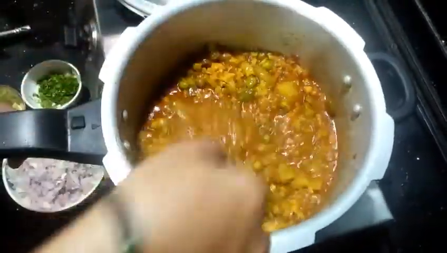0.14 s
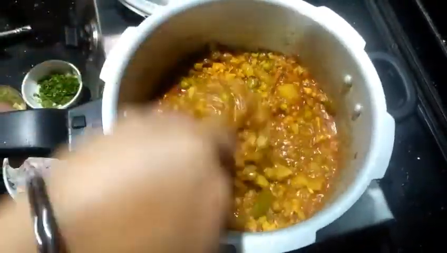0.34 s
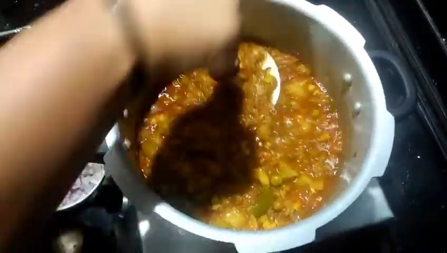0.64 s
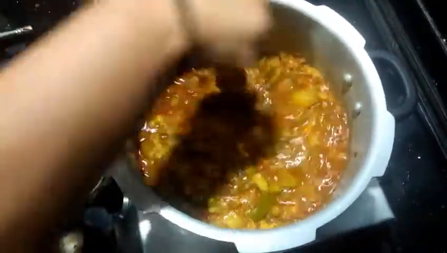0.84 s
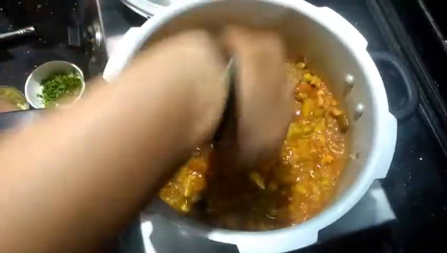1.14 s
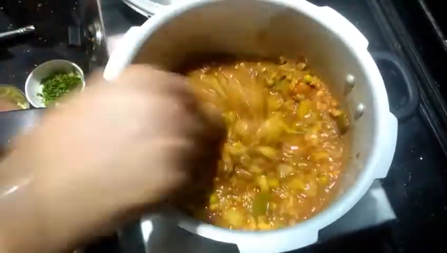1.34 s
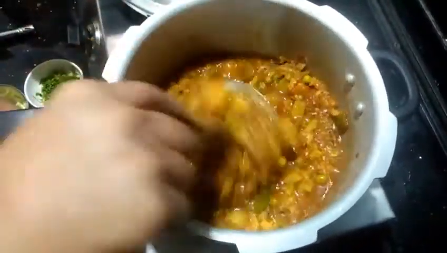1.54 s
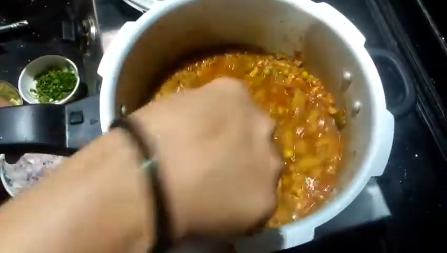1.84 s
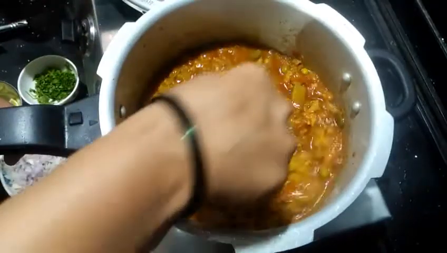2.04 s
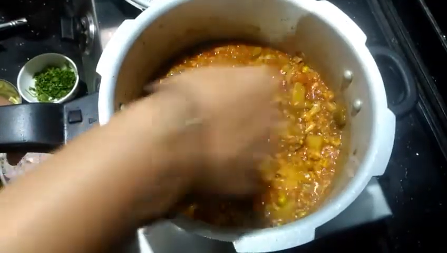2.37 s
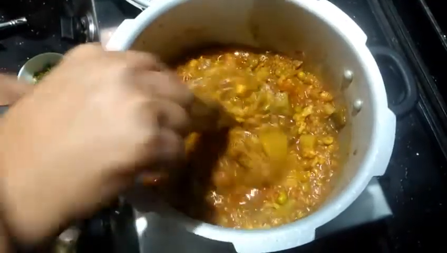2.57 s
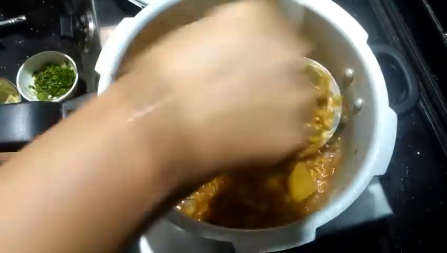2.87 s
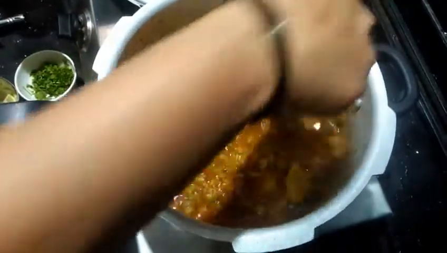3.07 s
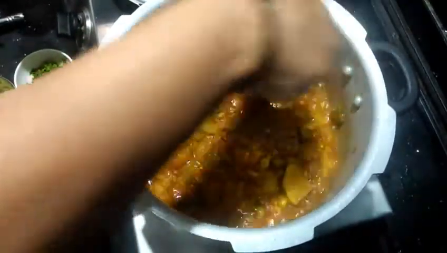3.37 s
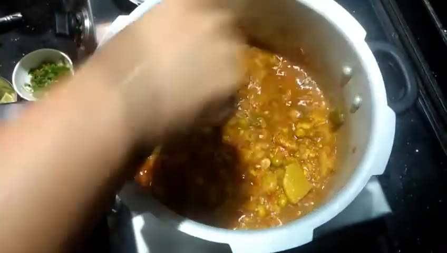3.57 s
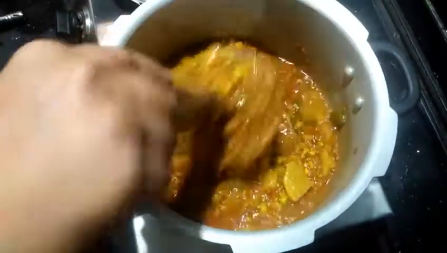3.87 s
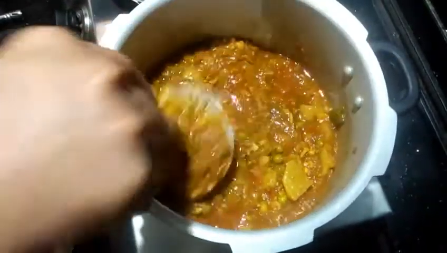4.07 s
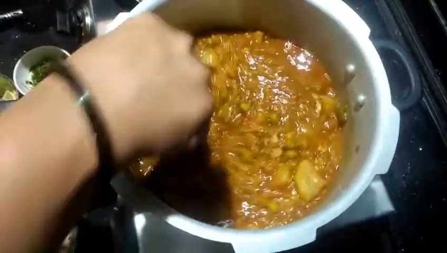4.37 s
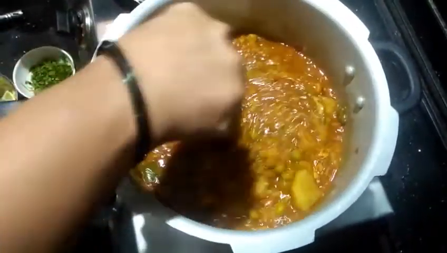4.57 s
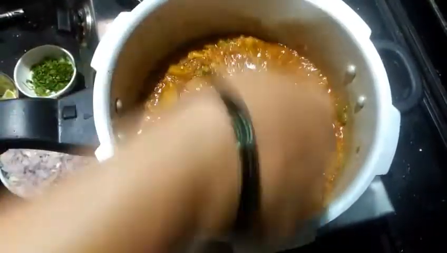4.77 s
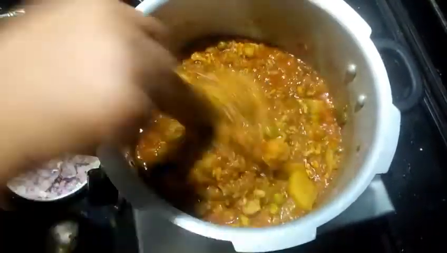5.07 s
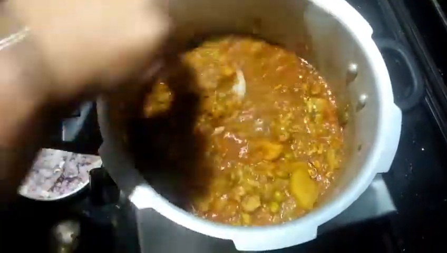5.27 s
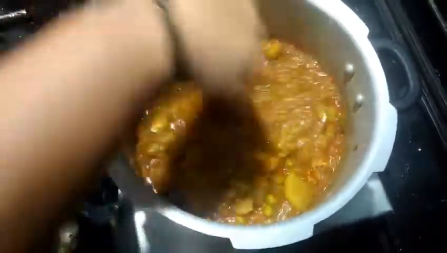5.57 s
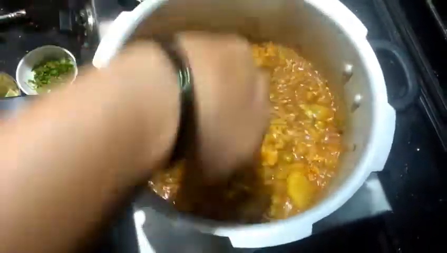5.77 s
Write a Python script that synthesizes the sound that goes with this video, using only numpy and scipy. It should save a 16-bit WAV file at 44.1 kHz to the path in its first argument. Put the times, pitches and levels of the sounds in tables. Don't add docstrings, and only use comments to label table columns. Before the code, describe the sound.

A hand masher works soft vegetables in sauce inside a deep metal pot, heard close by a nearly mono phone microphone in a small kitchen. Quiet squelching, rounded little pops and faint hiss begin at once over low rumble. At 0.7 seconds steel strikes high on the pot wall, a bright stuttering clank with a short ring cut off quickly. Light wet rubbing follows, with a small pop at 1.6. Near 1.9 comes a softer, rattlier knock, then a faint dull tap at 2.1. Pops gather from 2.7, peaking at 3.1 to 3.3 with thick squelches, sauce spits, scraping and a soft pot bump. Another bump falls at 3.6. The loudest knock hits the pot floor at 4.2, ringing clearly. After a muted bump near 4.65 the mashing fades; a crisp spit and scrape comes at 5.35, then faint rubbing and low bumps to about 6 seconds.

```python
import sys
import numpy as np
from scipy import signal
from scipy.io import wavfile
from scipy.ndimage import uniform_filter1d

SR = 44100
rng = np.random.default_rng(int(sys.argv[2]) if len(sys.argv) > 2 else 0)


def invert_db(x):
    u = np.asarray(x, float) / 20
    return 10 ** u


def generate_wav(sig):
    pcm = np.round(np.clip(np.atleast_2d(sig).T, -1, 1) * 32767).astype(np.int16)
    wavfile.write(sys.argv[1], SR, pcm)


N = 261104


def at_hz(points, hz):
    return np.interp(np.log(hz), np.log(np.array(points)[:, 0]), np.array(points)[:, 1])


def rms_one(x):
    return x / np.sqrt(np.mean(x ** 2) + 1e-20)


def drift(rate):
    r = np.exp(-80 * np.pi * rate / SR)
    steps = rng.standard_normal(N // 40 + 2002)
    slow = signal.lfilter([1], [1, -2 * r, r * r], steps)[2000:]
    return np.interp(np.arange(N) / 40, np.arange(len(slow)), rms_one(slow))


def bands(spectrum, source, shape):
    lowest, highest = spectrum[0][0], min(spectrum[-1][0], 16000)
    edges = lowest * 2 ** np.arange(0, np.log2(highest / lowest) + .34, 1 / 3)
    out = 0
    for k, (low, high) in enumerate(zip(edges, edges[1:])):
        hz = np.sqrt(low * high)
        part = signal.sosfilt(signal.butter(3, [low, high], "band", fs=SR, output="sos"), source[k % 2])
        out = out + invert_db(at_hz(spectrum, hz)) * shape(hz) * part
    return out


def random_grains(per_s, spread_db):
    strength = invert_db(spread_db * np.minimum(rng.exponential(1, N), 4))
    return (rng.random(N) < per_s / SR) * strength * rng.choice([-1, 1], N)


def wet_noise(spectrum, per_s, spread_db, smooth, patchy_db, patch_rate):
    source = rms_one(random_grains(per_s, spread_db)) + smooth * rng.standard_normal((2, N))
    together = drift(patch_rate)

    def flicker(hz):
        return invert_db(patchy_db * np.minimum(together + drift(patch_rate), 2.3))

    return rms_one(bands(spectrum, source, flicker))


def ringing(t, modes, spread_db):
    hz, db, t60 = np.transpose(modes)[:, :, None]
    strength = invert_db(db + spread_db * rng.standard_normal(hz.shape))
    rings = np.sum(strength * invert_db(-60 * t / t60) * np.sin(2 * np.pi * hz * t), axis=0)
    return rings / np.abs(rings).max()


def resonance(x, hz, width_hz, passes):
    r = np.exp(-np.pi * width_hz / SR)
    for _ in range(passes):
        x = signal.lfilter([1, 0, -1], [1, -2 * r * np.cos(2 * np.pi * hz / SR), r * r], x)
    return x


def add(out, s, sound):
    i = round(s * SR)
    out[i:i + len(sound)] += sound[:N - i]


# start_s, level_db (peak), crack_db (above 2.3 kHz), weight_db (below 500 Hz), tail_db
HARD_KNOCKS = [
    (0.7055, -14, -17.5, -40, -5),
    (1.8735, -20, -18, -29, -9),
    (2.100, -31, -60, -46, -9),
    (4.19, -10.5, -17, -23, -4),
]
# delay_s after its start, level_db
TOUCHES = [
    [(0, 0), (.005, -6), (.009, -9)],
    [(0, -1.5), (.002, -2), (.006, -5), (.017, -12)],
    [(0, -4), (.007, -1), (.015, -1), (.02, -4), (.03, -5), (.048, -11)],
    [(0, 0), (.0055, -3.5), (.015, -9), (.022, -10), (.05, -9)],
]
# crowd_db (dense modes), treble_db (of the crowd), masher_db, sheen_db (above 8 kHz)
ANSWERS = [
    (-5.5, 6.5, -9, -4),
    (-1.5, 3.5, -1, -16),
    (-0.7, 0.1, -7, -40),
    (1.5, 0.5, -12, -1.5),
]
# pitch_hz, level_db, t60_s
HIGH_WALL = [(420, -17, 0.16), (1044, -2, 0.22), (1150, -7, 0.22), (1288, -5, 0.2), (1357, 0.5, 0.2),
             (1400, -3, 0.2), (1966, 0, 0.2), (2078, -1, 0.2), (2385, -18, 0.2), (3112, -21, 0.2),
             (3370, -11, 0.3)]
# pitch_hz, level_db, t60_s
LOW_WALL = [(609, -14, 0.066), (744, -23, 0.3), (1089, -0.5, 0.12), (1473, -3, 0.12), (1578, 1.5, 0.1),
            (1755, -10.5, 0.15), (1960, -9, 0.3), (1378, -10, 0.2), (2745, -24, 0.2), (3300, -12, 0.05)]
# pitch_hz, level_db, t60_s
FLOOR = [(270, -14.5, 0.6), (323, -17, 0.5), (736, -17, 0.7), (863, -13, 0.6), (883, -12, 0.6),
         (1045, -1.5, 0.4), (1164, -7, 0.5), (1310, -8, 0.3), (1537, -9, 0.35), (1578, -5, 0.4),
         (1900, 0.5, 0.3), (1965, -4, 0.15), (3246, -19, 0.16), (3413, -20, 0.25)]
# pitch_hz, level_db, t60_s
MASHER_STEEL = [(3300, -2, .04), (3530, 0, .04), (3655, -6, .08), (3887, -4, .06), (4888, -6, .05),
                (5200, -6, .04), (5620, -10, .05), (6438, -12, .05), (7165, -9, .05), (7700, -14, .05),
                (8845, -17, .04)]
# pitch_hz, level_db per Hz
CROWD = [(88, -43), (150, -15), (232, -16.5), (327, -8), (527, -21), (740, -11), (1050, -4.5), (1220, -1),
         (1560, 1.5), (1720, -8), (1920, -1.5), (2760, -26), (3340, -12), (4500, -25), (6500, -21.5),
         (14200, -30)]
# pitch_hz, t60_s
CROWD_T60 = [(200, 0.5), (700, 1), (1500, 0.41), (4000, 0.56), (12000, 0.47)]
GATE_S = 0.21
SLIP = 1.8


def knock_ring(t, modes, touches):
    half, eighth = t[:SR // 2], t[:SR // 8]
    chatter = 0.022 * rng.standard_normal(SR // 4) * invert_db(-60 * t[:SR // 4] / 0.34)
    pot = stem = 0
    for delay, level in touches:
        later = (round(delay * SR), SR)
        pot_hit = ringing(half, modes, spread_db=2.0) * invert_db(-60 * half / 0.8)
        stem_hit = ringing(eighth, MASHER_STEEL, spread_db=3.0) * (1 - np.exp(-eighth / .0015))
        pot = pot + invert_db(level) * np.pad(pot_hit, later)[:SR]
        stem = stem + invert_db(SLIP * level) * np.pad(stem_hit, later)[:SR]
    return pot + signal.fftconvolve(pot, chatter)[:SR], stem


def knocks():
    out, t = np.zeros(N), np.arange(SR) / SR
    dull = signal.butter(8, 2300, fs=SR, output="sos")
    sheen = signal.butter(2, 8000, "high", fs=SR, output="sos")
    rattle = invert_db(1.3 * drift(40))
    places = [HIGH_WALL, LOW_WALL, LOW_WALL, FLOOR]
    for knock, answer, modes, touches in zip(HARD_KNOCKS, ANSWERS, places, TOUCHES):
        s, db, crack_db, weight_db, tail_db = knock
        crowd_db, treble_db, masher_db, sheen_db = answer

        def fading(t60, slip=1):
            return sum(invert_db(slip * a - 60 * np.abs(t - d) / t60) * (t >= d) for d, a in touches)

        tail = invert_db(tail_db) * rattle[round(s * SR):][:SR]
        burst = fading(0.055)
        tilt_db = [(500, weight_db + 19.5), (950, 0), (2400, 0), (3000, treble_db)]

        def dying(hz):
            return invert_db(at_hz(tilt_db, hz)) * (tail * invert_db(-60 * t / at_hz(CROWD_T60, hz)) + burst)

        crowd = bands(CROWD, rng.standard_normal((2, SR)), dying)
        clear, stem = knock_ring(t, modes, touches)
        crack = invert_db(-6) * rng.standard_normal(SR) * fading(.012, SLIP) + invert_db(masher_db) * stem
        hit = invert_db(-1.5) * clear / np.abs(clear).max() + invert_db(crowd_db) * crowd / np.abs(crowd).max() + crack
        hit = (1 - np.exp(-t / 0.0005)) * invert_db(-12 * (t / GATE_S) ** 3) * hit
        hit -= (1 - invert_db(min(sheen_db, 0))) * signal.sosfiltfilt(sheen, hit)
        low = signal.sosfiltfilt(dull, hit)
        add(out, s, invert_db(db) * (low + invert_db(crack_db + 17) * (hit - low)))
    return out


# start_s, level_db (peak), pitch_hz
AIR_POPS = [(0.232, -48, 869), (0.282, -34.5, 1270), (0.291, -35, 1202), (0.407, -50, 1290),
            (0.575, -51, 1190), (0.636, -44, 910), (0.834, -44, 646), (0.878, -42.5, 660),
            (1.039, -48, 930), (1.418, -50.5, 734), (2.07, -37, 854), (2.235, -35, 1310),
            (2.266, -45, 1360), (2.368, -35, 1270), (2.698, -41.5, 1450), (2.808, -36, 1180),
            (2.848, -40, 1254), (2.878, -30, 1200), (2.969, -37.5, 1223), (3.111, -26, 1320),
            (3.2615, -34, 1120), (3.542, -44, 1286), (3.691, -48, 1450), (4.017, -46.5, 1220),
            (4.102, -38, 996), (4.181, -44, 900), (4.481, -40.5, 1225), (4.585, -48, 1157),
            (4.72, -45, 1253), (4.862, -53, 1270),
            (0.018, -27, 1780), (0.158, -53, 1660), (0.235, -49, 2400), (0.4096, -53, 1880),
              (0.4334, -51, 1940), (0.5727, -49, 1800), (0.649, -47, 1820), (0.984, -45.5, 1700),
              (1.621, -32.5, 1870), (1.67, -48, 1950), (1.8128, -52, 2370), (2.3713, -42, 1640),
              (2.399, -45.5, 2466), (2.555, -44, 1880), (2.596, -37.5, 1880), (2.9694, -40, 1800),
              (3.072, -37, 2540), (3.204, -40, 2045), (3.8425, -50.5, 1755), (3.88, -38.5, 1900),
              (4.751, -47.5, 1650), (5.05, -57.5, 1620),
            (.07, -52, 520), (.41, -52, 2380), (.5, -50, 1230), (.5, -52, 870), (.632, -48, 600),
              (.91, -53, 417), (.949, -48, 651), (.978, -53, 431), (1.04, -51, 1260), (1.095, -49, 1340),
              (1.099, -55, 420), (1.11, -53, 2050), (1.12, -52, 880), (1.184, -60, 431), (1.294, -60, 323),
              (1.298, -54, 754), (1.48, -55, 1800), (1.558, -52, 705), (1.605, -50, 950),
              (1.615, -51, 1300), (1.832, -46, 1200), (1.862, -46, 1100), (2.495, -50, 859),
              (2.646, -53, 856), (2.686, -54, 1030), (2.748, -46, 1250), (2.795, -50, 947),
              (2.925, -49, 1060), (2.968, -58, 431), (3.065, -48, 1310), (3.071, -41, 697),
              (3.254, -42, 1350), (3.317, -46, 554), (3.345, -45, 900), (3.35, -47, 1450), (3.43, -48, 900),
              (3.465, -47, 886), (3.564, -47, 1440), (3.601, -44, 875), (3.623, -42, 630),
              (3.774, -52, 541), (3.828, -49, 560), (3.928, -52, 530), (3.988, -49, 872), (4.14, -52, 900),
              (4.51, -51, 1300), (4.635, -51, 412), (4.66, -54, 1230), (4.755, -51, 1270),
              (4.79, -55, 1600), (4.93, -59, 1680), (5.831, -60, 404), (5.885, -60, 420)]
RING_S, RING_S_PER_DB = 0.016, 0.0004
RING_CYCLES = 12


def pops():
    out, t = np.zeros(N), np.arange(SR // 8) / SR
    swell = 1 - np.exp(-(t / .002) ** 2)
    for s, db, hz in AIR_POPS:
        ring = np.sin(2 * np.pi * hz * (t + .5 * t * t))
        band = signal.butter(2, [hz * .75, hz * 1.3], "band", fs=SR, output="sos")
        rough = rms_one(signal.sosfilt(band, rng.standard_normal(len(t))))
        t60 = max(RING_S + RING_CYCLES / hz - RING_S_PER_DB * (db + 40), .005)
        burst = swell * invert_db(-60 * t / t60) * (ring + 0.35 * rough)
        add(out, s - .001, invert_db(db + 2.5) * signal.sosfilt(band, burst))
    return out


# start_s, level_db (peak), pitch_hz
SAUCE_SPITS = [(0.0218, -52.5, 3540), (0.0723, -52.5, 5160), (0.4994, -51.5, 3000), (0.634, -59, 8600),
               (1.5196, -50.5, 4140), (1.8128, -40, 3560), (1.8128, -44, 4800), (1.8185, -45, 8300),
               (1.566, -55, 4600), (2.16, -56, 13000), (2.206, -56, 7600), (2.739, -57, 4200),
               (2.9377, -53, 11300), (2.9841, -53, 3430), (3.072, -42, 6000), (3.1063, -38, 5300),
               (3.1294, -34.5, 4000), (3.2015, -38.5, 3570), (3.6922, -50, 3120), (3.854, -61, 5940),
               (3.901, -61, 4400), (3.9955, -65, 5590), (4.075, -61, 8000), (4.1112, -41, 7950),
               (4.123, -50, 11700), (4.4603, -59, 3270), (4.4816, -43, 3200), (4.611, -52, 3950),
               (4.76, -63.5, 8110), (5.1714, -64, 7900), (5.2989, -64, 8000), (5.3441, -35.5, 4370),
               (5.3653, -39, 4930),
               (.283, -56, 2900), (.4868, -55, 6060), (.96, -58, 4500), (1.04, -58, 3500), (1.1, -58, 5000),
             (2.3734, -57, 4300), (2.482, -60, 3350), (2.555, -60, 4600), (2.5974, -58, 3300),
             (2.5974, -60, 5400), (2.632, -60, 3300), (2.69, -56, 5200), (2.84, -59, 5000),
             (2.864, -59, 3500), (2.937, -58, 5700), (2.99, -57, 4600), (3.074, -42, 6400),
             (3.116, -44, 5700), (3.119, -44, 4000), (3.131, -42, 3200), (3.14, -46, 4200),
             (3.21, -44, 4600), (3.236, -48, 2600), (3.3668, -54, 2900), (3.417, -54, 4800),
             (3.8432, -57, 3120)]


def spits():
    out, t = np.zeros(N), np.arange(SR // 12) / SR
    bright = signal.butter(2, 3000, "high", fs=SR, output="sos")
    shape = (1 - np.exp(-t / 0.0012)) * invert_db(-60 * t / 0.036)
    for s, db, hz in SAUCE_SPITS:
        puff = rng.standard_normal(len(t))
        band = signal.butter(1, [hz * 0.9, hz * 1.12], "band", fs=SR, output="sos")
        peak = rms_one(signal.sosfilt(band, puff))
        wide = rms_one(signal.sosfilt(bright, puff))
        add(out, s, invert_db(db - 4.5) * shape * (peak + 0.17 * wide))
    return out


# pitch_hz, width_hz, level_db
AIR_SPACE = [(590, 120, -2.5), (882, 81, -0.5), (1050, 110, -6), (1270, 190, 0.5), (1605, 150, -6),
             (429.8, 40, -12), (1900, 420, -4), (2120, 220, -13), (2650, 260, -11)]


def squelch(per_s, spread_db, patchy_db):
    out = 0
    for hz, width_hz, db in AIR_SPACE:
        grains = signal.lfilter([1], [1, -.7], random_grains(per_s, spread_db))
        source = rms_one(grains) + 0.98 * rng.standard_normal(N)
        tone = rms_one(resonance(source, hz, width_hz, passes=2))
        out = out + invert_db(db + patchy_db * drift(5.4)) * tone
    return rms_one(out)


# pitch_hz, level_db per Hz
MASH_COLOUR = [(240, -42), (400, -16.5), (649, -2), (1100, -0.5), (1240, -0.5), (1570, -10.5), (1920, -6),
               (3400, -23.5), (4420, -60), (7480, -120)]


def squeezed_mash():
    return wet_noise(MASH_COLOUR, per_s=280, spread_db=-4.5, smooth=2.2, patchy_db=3.5, patch_rate=12)


# time_s, level_db
STROKE_EFFORT = [(0.0, -58.5), (0.63, -61), (0.74, -54.5), (1.19, -59), (1.35, -64.5), (1.7, -58),
                 (2.04, -54), (2.36, -60.5), (2.93, -56), (3.18, -50), (3.4, -50.5), (3.5, -57.5),
                 (4.14, -66.5), (4.22, -54), (4.48, -59), (4.8, -68.5), (5.57, -66), (5.92, -70)]


def effort():
    s, db = np.transpose(STROKE_EFFORT)
    return np.interp(np.arange(N) / SR, s, db)


# start_s, length_s, level_db (start), change_db (to end)
DRAGS = [(0.03, 0.093, -76, 6), (0.232, 0.1, -76, -0.6), (0.432, 0.1, -72, 1.5), (0.635, 0.065, -72, 14),
         (0.9, 0.44, -72.5, -2.5), (1.477, 0.35, -73, -1.5), (1.816, 0.054, -54, -12),
         (2.117, 0.15, -73.5, 3), (2.564, 0.49, -81, 8), (3.074, 0.028, -49, -7), (3.108, 0.085, -49.5, -6),
         (3.2, 0.05, -52, -9), (3.252, 0.23, -64, -7), (3.581, 0.092, -72, -3), (3.855, 0.071, -63.5, -8),
         (3.99, 0.12, -82, 6), (4.115, 0.054, -54, -14), (4.47, 0.16, -70.5, -3), (5.3, 0.04, -70, 20),
         (5.348, 0.091, -45, -23), (5.487, 0.084, -68.5, -13)]
# pitch_hz, level_db per Hz
WET_HISS = [(1940, -27.5), (3300, -4), (5720, -6), (6700, -5), (8610, -6.5), (10000, -14), (12600, -9),
            (14200, -7)]
GRIP_S, LET_GO_S, EDGE_DB = 0.015, 0.025, 22


def scrapes():
    t, gain = np.arange(N) / SR, 0
    for s, length, db, change_db in DRAGS:
        end_db = db + change_db
        times = [s - GRIP_S, s, s + length, s + length + LET_GO_S]
        levels = [db - EDGE_DB, db, end_db, end_db - EDGE_DB]
        gain = gain + invert_db(np.interp(t, times, levels, left=-200, right=-200))
    grit = wet_noise(WET_HISS, per_s=900, spread_db=4.0, smooth=1.2, patchy_db=2.6, patch_rate=25)
    return invert_db(-2.5) * gain * grit


def sauce_hiss(swing_db):
    hiss = wet_noise(WET_HISS, per_s=600, spread_db=2.5, smooth=2.0, patchy_db=1.7, patch_rate=25)
    return invert_db(-80.0 + 0.7 * swing_db) * hiss


# start_s, length_s, pitch_hz, level_db
SINGING_RUBS = [(0.02, 0.11, 1810, -58), (0.29, 0.26, 1240, -60), (0.78, 0.34, 656, -56),
                (1.41, 0.34, 705, -59.5), (1.62, 0.098, 1910, -55), (1.92, 0.55, 1880, -56.5),
                (1.9, 0.3, 594, -57.5), (2.68, 0.47, 1194, -57.5), (3.07, 0.2, 2720, -55),
                (3.07, 0.17, 726, -50), (3.105, 0.09, 1980, -50), (2.55, 0.1, 1900, -57),
                (2.62, 0.15, 2480, -66), (2.9, 0.15, 2620, -64), (2.16, 0.14, 2650, -66),
                (0.28, 0.07, 500, -66), (3.25, 0.2, 2100, -59), (3.3, 0.29, 915, -62.5),
                (3.3, 0.2, 590, -60.5), (3.75, 0.25, 560, -62), (3.54, 0.1, 1365, -57),
                (3.58, 0.1, 900, -55), (4.64, 0.26, 834, -62), (4.74, 0.91, 1603, -70),
                (4.95, 0.18, 790, -66), (4.93, 0.3, 2100, -72), (5.11, 0.13, 2680, -75),
                (5.36, 0.07, 2300, -68), (5.36, 0.07, 1400, -68), (5.6, 0.2, 1500, -69),
                (5.14, 0.1, 2320, -73), (5.05, 0.15, 560, -68), (4.42, 0.1, 600, -62),
                (3.46, 0.06, 1900, -58), (1.15, 0.12, 2180, -68), (1.13, 0.14, 870, -62),
                (5.47, 0.13, 2470, -60), (5.464, 0.093, 2160, -60), (5.573, 0.22, 2430, -72.5),
                (5.47, 0.3, 1900, -65), (5.46, 0.093, 692, -60), (5.59, 0.22, 598, -68)]


def rubs():
    out, t = np.zeros(N), np.arange(SR) / SR
    for s, length, hz, db in SINGING_RUBS:
        steps = rng.standard_normal(SR // 500 + 1).repeat(500)[:SR]
        grit = rng.standard_normal(SR) * invert_db(3.5 * uniform_filter1d(steps, size=300))
        tone = resonance(grit, hz, width_hz=30 + 0.025 * hz, passes=1)
        band = signal.butter(2, [hz * .87, hz * 1.13], "band", fs=SR, output="sos")
        tone = rms_one(signal.sosfilt(band, tone))
        shape = (1 - np.exp(-(t / .005) ** 2)) * invert_db(-6 * t / length - 12 * (t / length) ** 4)
        add(out, s, invert_db(db - 2) * shape * tone)
    return out


# start_s, level_db (peak)
ROCKS = [
    (3.09, -44),
    (3.597, -43),
    (4.648, -45),
    (5.595, -47),
]
# pitch_hz, level_db, t60_s
BASE = [(270, 0, .2), (325, -4, .15), (420, -5, .1), (560, -2, .08), (800, -3, .07)]


def thuds():
    out, t = np.zeros(N), np.arange(SR // 2) / SR
    for s, db in ROCKS:
        push = rng.standard_normal(len(t)) * (1 - np.exp(-t / 0.0066)) * invert_db(-12 * (t / 0.11) ** 2)
        rings = signal.fftconvolve(push, ringing(t, BASE, spread_db=1.5))[:len(t)]
        add(out, s - .01, invert_db(db) * rings / np.abs(rings).max())
    return out


# start_s, level_db (peak), pitch_hz
STOVE_JOLTS = [(0.441, -56, 180), (0.971, -54, 194), (1.188, -57, 116), (1.409, -58, 59), (2.117, -60, 51),
               (2.264, -60, 108), (2.686, -57, 116), (2.965, -57, 124), (3.15, -58, 110), (3.385, -54, 54),
               (3.587, -55, 180), (3.967, -62, 97), (4.02, -60, 51), (4.592, -59, 67), (5.045, -60, 75),
               (5.095, -59, 78), (5.15, -61, 90), (5.215, -55, 78), (5.364, -56, 110), (5.39, -55, 165),
               (5.49, -58, 62), (5.567, -53, 57), (5.7, -56, 55), (5.81, -57, 55)]
JOLT_CYCLES = 1.2


def jolts():
    out, t = np.zeros(N), np.arange(SR // 8) / SR
    for s, db, hz in STOVE_JOLTS:
        cycles = hz * t
        swell = (1 - np.exp(-(cycles / .6) ** 2)) * np.exp(-(cycles / (2 * JOLT_CYCLES)) ** 2)
        add(out, s, invert_db(db - 2.5) * np.sin(2 * np.pi * cycles) * swell)
    return out


# peak_s, half_length_s, body_db, rumble_db
POT_SHOVES = [(0.05, 0.25, -68.5, -64), (0.55, 0.15, -72, -68), (0.8, 0.15, -61, -65.5),
              (1.05, 0.14, -66.5, -67.5), (1.45, 0.12, -70, -67), (1.93, 0.089, -80.5, -64.5),
              (2.33, 0.15, -72.5, -69), (2.98, 0.074, -64.5, -66), (3.33, 0.061, -60.5, -72),
              (3.41, 0.049, -78, -62.5), (3.55, 0.057, -65, -74), (3.71, 0.15, -77, -64),
              (4.24, 0.1, -63, -62.5), (4.702, 0.08, -57.5, -69), (5.1, 0.099, -84, -71),
              (5.4, 0.07, -72, -66), (5.7, 0.15, -72, -64.5), (5.9, 0.17, -67, -64.5)]


def shoves(rest_db, column):
    t = np.arange(N) / SR
    power = invert_db(rest_db) ** 2
    for row in POT_SHOVES:
        power = power + invert_db(2 * row[column]) * np.exp(-((t - row[0]) / row[1]) ** 2)
    return np.sqrt(power)


# pitch_hz, level_db per Hz
BODY_COLOUR = [(94, -24.5), (160, -2), (232, -9), (328, -1.5), (365, -20), (419, -12.5), (600, -2.5),
               (780, -26.5), (1320, -120)]


def pot_body(swing_db):
    murmur = wet_noise(BODY_COLOUR, per_s=60, spread_db=2.0, smooth=2.0, patchy_db=3.0, patch_rate=6)
    return shoves(-76.0 + 0.4 * swing_db, column=2) * murmur


# pitch_hz, level_db per Hz
RUMBLE_COLOUR = [(12, -41), (20, -9), (22, -17.5), (36, -3), (54, 8.5), (146, -1.5), (187, -1.5),
                 (220, -14.5), (290, -42), (480, -120)]


def room_rumble():
    low = wet_noise(RUMBLE_COLOUR, per_s=20, spread_db=1.0, smooth=3.0, patchy_db=2.0, patch_rate=5)
    return shoves(-76, column=3) * low


def kitchen(x, t60, wet_db):
    t = np.arange(SR // 2) / SR
    tail = rng.standard_normal(len(t)) * invert_db(-60 * t / t60) * (1 - np.exp(-t / 0.0035))
    return invert_db(wet_db) * signal.fftconvolve(x, tail / np.sqrt(np.sum(tail ** 2)))[:N]


def two_ports(mid):
    above = signal.butter(6, 6100, "high", fs=SR, output="sos")
    unlike = signal.sosfilt(above, mid) * drift(450)
    side = invert_db(-3.5) * signal.sosfilt(above, unlike)
    return np.array([mid + side, mid - side])


def scene():
    squelch_db = effort()
    swing_db = squelch_db + 60
    small = pops() + spits()
    no_bass = signal.butter(3, 170, "high", fs=SR, output="sos")
    mid = signal.sosfilt(no_bass, knocks() + thuds())
    mid += small + kitchen(small, t60=.2, wet_db=-9.5)
    mid += invert_db(squelch_db - 6) * squelch(per_s=100, spread_db=2.8, patchy_db=3.2)
    mid += invert_db(squelch_db - 6.5) * squeezed_mash()
    mid += scrapes() + sauce_hiss(swing_db) + rubs()
    mid += jolts() + pot_body(swing_db) + room_rumble()
    return two_ports(mid)


def band_limit(x):
    return signal.sosfilt(signal.butter(12, 15600, fs=SR, output="sos"), x)


def record(dry):
    top_cut = signal.ellip(12, .5, 38, 14300, fs=SR, output="sos")
    return band_limit(signal.sosfilt(top_cut, dry))


dry = scene()
out = record(dry)
generate_wav(out)
```